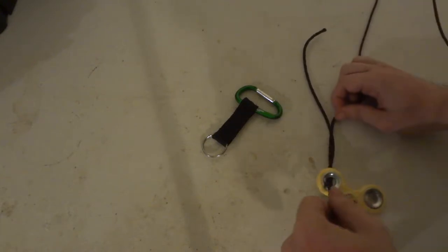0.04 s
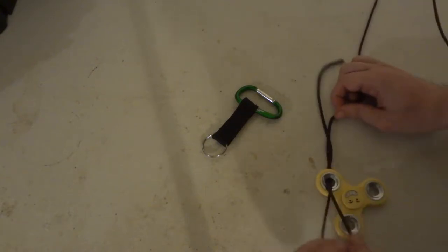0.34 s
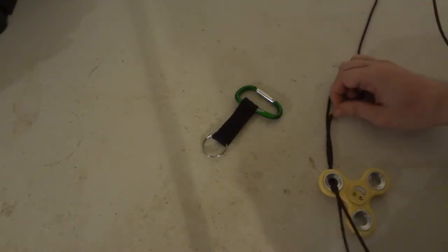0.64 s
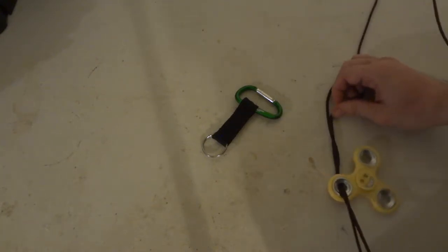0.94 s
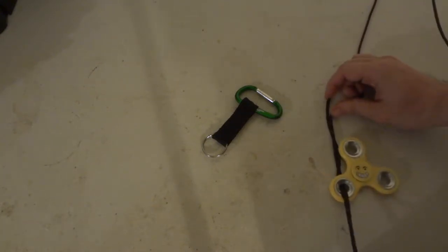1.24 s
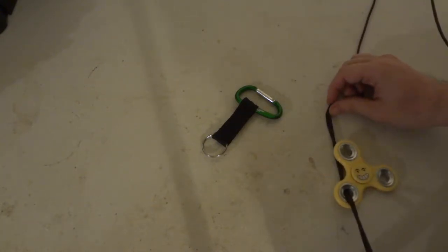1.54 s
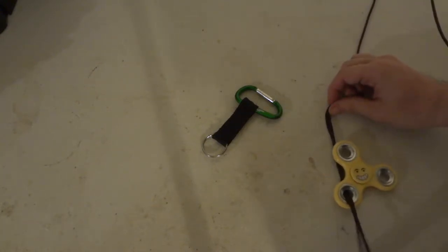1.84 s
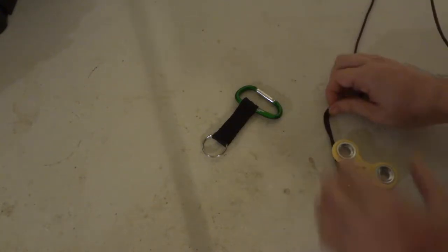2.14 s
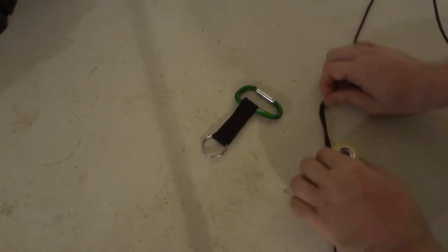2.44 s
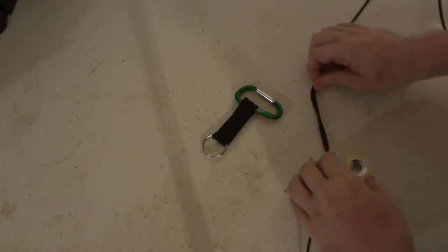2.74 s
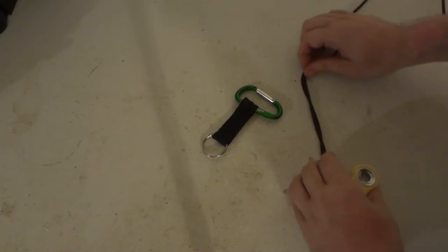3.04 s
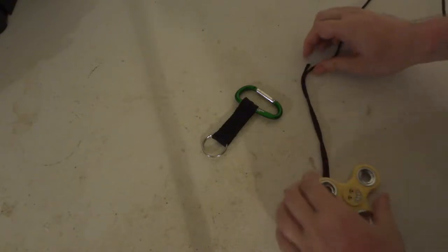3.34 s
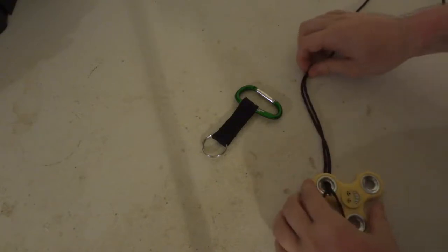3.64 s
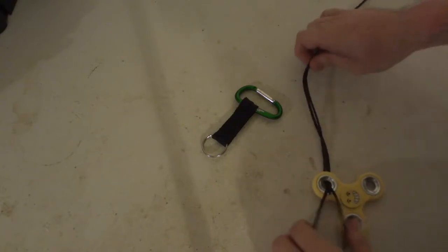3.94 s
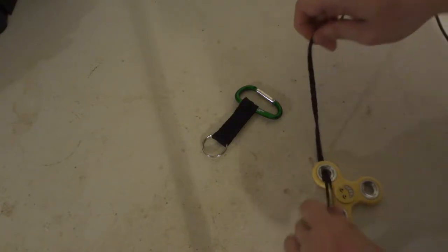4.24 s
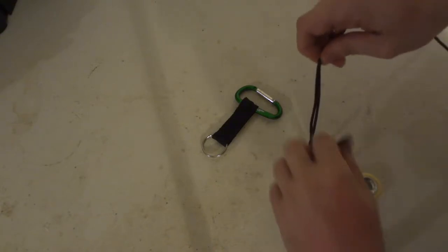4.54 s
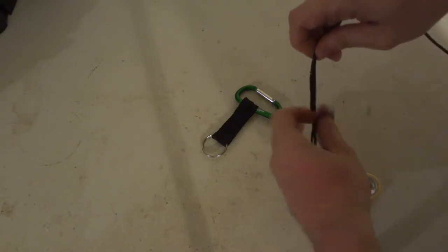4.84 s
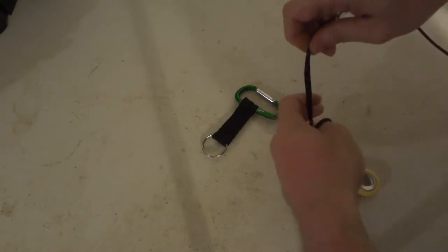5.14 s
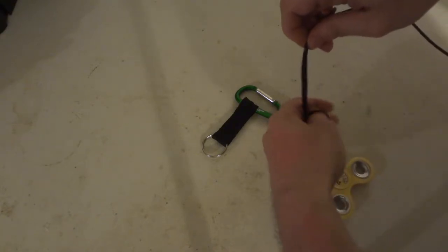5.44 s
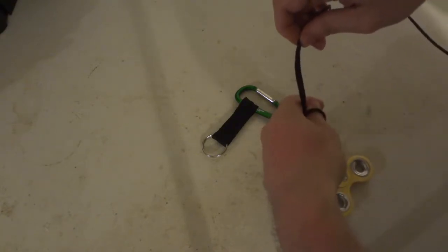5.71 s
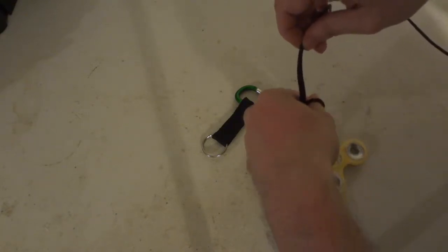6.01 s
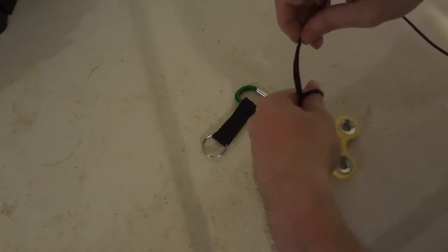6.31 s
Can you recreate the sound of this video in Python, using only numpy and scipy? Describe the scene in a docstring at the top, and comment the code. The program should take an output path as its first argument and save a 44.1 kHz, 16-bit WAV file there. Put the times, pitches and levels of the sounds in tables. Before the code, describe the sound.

Soft, scattered thuds, clacks and tiny metallic chinks from a plastic spinner toy shifting on a work surface as cord slides through it.

```python
"""Threading a finger spinner

Hands thread a cord through a plastic finger spinner on a hollow plastic work surface in a quiet room.
The spinner rocks and drops: flat landings thud the surface, edge landings clack, and jolts make the
steel bearings chink. Dragged, it judders in tiny slips. The cord rubs faintly as it is drawn through,
and the centre bearing sings while the spinner swings free."""
import sys
import numpy as np
from scipy import signal
from scipy.fft import rfft, irfft
from scipy.io import wavfile

SR = 44100
rng = np.random.default_rng(int(sys.argv[2]) if len(sys.argv) > 2 else 0)


def master(y):
    """Save y as 16-bit WAV."""
    cut = np.clip(np.atleast_2d(y).T, -1, 1)
    pcm = np.round(cut * 32767)  # scale
    wavfile.write(sys.argv[1], SR, pcm.astype(np.int16))


N = 285503

# spinner landings: (time [s], level [dB], rim [0 flat to 1 edge on], hardness [0-1],
# weight of the hand [0-1], gap to the first rebound [s])
LANDINGS = [(0.003, -36.5, .25, 0.3, 0.18, .013), (0.12, -38.5, 0.49, 1, 0.75, 0.022),
            (0.943, -33, 0.19, 0.58, 0.17, .014), (1.367, -33, 0.25, 0.43, 0.24, .013),
            (1.437, -32, 0.28, 0.33, .02, 0.029), (1.529, -29.5, 0.23, 0.07, 0.06, 0.025),
            (1.686, -38.5, 0.13, .25, 0.3, .012), (1.712, -28, 0.21, .8, 0.04, .02),
            (2.282, -27.5, 0.49, 0.3, 0.05, 0.028), (2.328, -19, 0.31, 0.61, 0.06, 0.019),
            (2.359, -18, .17, 0.51, 0.08, .019), (2.392, -30, 0.35, 0.3, 0.28, .012),
            (2.424, -38, .7, .3, 0.7, .012), (3.336, -37, 0.38, 0, 0, 0.021),
            (3.388, -43.5, 0.57, 0.2, .05, 0.0095), (3.479, -44.5, .62, 0.2, 0.78, .008),
            (3.503, -34.5, 0.26, 0.87, .15, 0.016), (3.54, -36.5, 0.3, 0, .4, .022),
            (3.954, -40, 0.3, .15, .02, .012), (4.854, -34.5, .52, .75, 0.36, .01),
            (4.876, -38, 0.75, 0.3, 0.53, .021), (4.93, -54, 0.84, 0, 0.3, 0.011),
            (5.27, -47.5, 0.78, 0.37, 0.97, .012), (5.871, -42.5, .14, 0.4, 0.33, .023),
            (5.93, -29.5, 0.13, 0.45, 0.09, 0.022), (5.971, -36.5, 0.11, .3, 0.33, 0.012),
            (5.995, -36, 0.16, 0.9, 0.56, .012), (6.306, -30.5, 0.07, 0.4, .35, 0.011),
            (6.315, -17.5, .62, 0.57, 0.4, 0.014)]
# modes of the surface with the spinner on it: (pitch [Hz])
SURFACE_HZ = [120, 163, 209, 282, 308, 344, 372, 428, 510, 556, 590, 672, 744, 803, 891, 1042, 1095, 1122,
              1205, 1265, 1352, 1448, 1612, 1675, 1705, 1997, 2320, 2650, 2985, 3350]
# balance of those modes: (level [dB])
SURFACE_DB = [-2, -3, 4.5, -9.5, -0.5, -1, 5, -2.5, -6.5, -4, -37, -20, -2, -4, 1, 6.5, 5, -16.5, -6, -1.5,
              -4, -7.5, -10, -27, -57, -25.5, -15.5, -15.5, -21, -11]
# their decay: (frequency [Hz], t60 [s])
SURFACE_T60 = [(120, 0.17), (320, 0.15), (600, 0.3), (1120, 0.08), (1700, 0.25), (3400, 0.022)]
# the patch under a blow, which sheds its motion at once: (pitch [Hz], level [dB], t60 [s])
PATCH_MODES = [(330, 0, .045), (720, -5, .014), (1115, 0, .05), (1650, -4, .014), (3000, -8, .008)]
# colour of the tail, the surface's dense ring and close reflections: (frequency [Hz], level [dB])
TAIL_COLOUR = [(40, -22), (100, -7.5), (200, -18), (330, 8), (520, 4), (800, 2.5), (1120, 5.5), (1650, -3),
               (2300, -19), (4000, -20.5), (6500, -30), (11000, -41.5)]
# decay of that tail: (frequency [Hz], t60 [s])
TAIL_T60 = [(100, 0.75), (400, 0.2), (1200, 0.22), (4000, 0.2), (10000, 0.21)]
# bearings rattling in their seats: (time [s], length [s], relative level [dB], brightest pitch [Hz])
RATTLES = [(0.12, .015, -47, 6000), (1.534, .012, -47, 10600), (1.688, .004, -53, 9050),
           (2.3285, .015, -44, 6150), (2.3635, .004, -46, 8300), (2.3814, .055, -42.5, 7700),
           (4.8544, .004, -45, 7600), (5.936, .004, -51, 9400), (5.951, .004, -44, 6800),
           (5.985, .026, -40, 9200)]
# modes of the steel bearings: (pitch [Hz], level [dB], t60 [s])
STEEL_MODES = [(4400, -22, 0.0088), (5690, 14.5, 0.032), (7150, 4, 0.02), (7480, -3, 0.087),
               (8030, 7.5, 0.057), (9100, -8, 0.018), (10200, -1, 0.061), (8650, 14.5, 0.061),
               (9900, -3.5, 0.022), (10500, -22, 0.013)]
# pushes over the surface, lower when pressed harder: (time [s], length [s], level [dB], judder [Hz])
DRAGS = [(1.476, 0.089, -58, 895), (3.144, .025, -56.5, 1000), (3.173, 0.046, -47, 1180),
         (3.226, 0.084, -58.5, 513), (3.314, 0.071, -58.5, 1010), (3.404, 0.043, -51.5, 432),
         (3.54, 0.043, -48.5, 353), (3.727, 0.054, -61.5, 1140), (3.827, 0.11, -43.5, 667),
         (3.949, 0.037, -43.5, 660), (3.988, 0.053, -54.5, 675), (4.083, 0.023, -59.5, 1300),
         (5.89, 0.036, -60, 260), (5.932, 0.016, -48, 533), (5.982, 0.025, -49, 310),
         (6.04, .12, -61.5, 266), (6.083, 0.036, -60, 970)]
# pulls on the cord: (time [s], length [s], relative starting level [dB])
PULLS = [(0.16, 0.29, -66.5), (2.455, 0.643, -55)]
# colour of the cord's rub: (frequency [Hz], level [dB])
CORD_COLOUR = [(100, -26.5), (320, -9.5), (700, -14), (1000, -6.5), (1130, 3), (1260, -3.5), (2000, -17.5),
               (4000, -23.5), (10000, -31)]
# envelope of the centre bearing's whistle: (time [s], level [dB])
WHISTLE_ENVELOPE = [(0, -73), (.2, -79), (1.3, -78.5), (2.2, -78.5), (2.42, -75), (2.9, -102)]
# stereo image of the tail and the cord: (frequency [Hz], left-right likeness [-1 to 1])
NEAR_IMAGE = [(300, 1), (550, 0.9), (1100, 0.72), (2500, 0.56), (9000, 0.76)]
# colour of the room tone: (frequency [Hz], level [dB])
ROOM_COLOUR = [(15, -59), (25, -18), (112, -6), (173, -7), (197, -5), (267, -4.5), (401, 0.5), (531, 2.5),
               (1900, -3.5), (2450, -7), (3590, -10), (5820, -13), (11000, -17), (14300, -70),
               (22000, -120)]
# stereo image of the room tone: (frequency [Hz], left-right likeness [-1 to 1])
ROOM_IMAGE = [(60, 1), (170, 0.34), (480, -0.67), (1360, -0.47), (3860, -0.00096), (10900, 0.81)]

RING_TIME = np.arange(SR // 3) / SR  # time axis of one hit [s]


def landings(contacts=3, rebound_db=-7):
    """The spinner rocks to rest: each rebound comes sooner, weaker, flatter and softer."""
    out = np.zeros((2, N))
    for s, db, rim, hardness, weight, gap in LANDINGS:
        for k in range(contacts):
            add(out, s, gain_of(db + k * rebound_db) * blow(rim * 0.62 ** k, hardness * 0.24 ** k, weight))
            s += gap * 0.85 ** k
    return out


def blow(rim, hardness, weight):
    """One contact: flat blows mostly thud, edge blows clack, and hard edge blows crack as well."""
    tap = surface_tap(tail_db=-4, patch_db=-5)
    flat = gain_of(-8) * thud(tap, weight) * gain_of([[0.4], [-0.4]])  # leans slightly left
    edge = gain_of(-4) * clack(tap, rim) + hardness * gain_of(-10) * crack(tap)
    return (1 - rim) * flat + rim * edge


def thud(tap, weight, unloaded_hz=355, sag_octaves=0.79, damping_s=0.088):
    """The hollow surface favours one low mode, which sags under the hand; cord and fingers damp it."""
    pitch = unloaded_hz * 2 ** (-sag_octaves * weight)
    boom = struck(band(tap, pitch * np.exp([-1 / 5, 1 / 5]), "band", order=2))
    dull = band(tap, 680, "low", order=4)
    body = struck(band(dull, 0.72 * pitch, "high", order=5))
    damped = struck((body + gain_of(-4) * boom) * np.exp(-RING_TIME / damping_s))
    flex = struck(band(tap, [105, 190], "band", order=4))  # a hand's weight flexes the whole sheet
    return struck(damped + weight * gain_of(-11) * flex)


def clack(tap, rim, spinner_hz=1116, width_hz=55.6):
    """Plastic midrange; the more edge on the blow, the more the spinner's own note rings."""
    mids = struck(band(tap, [620, 2100], "band"))
    note = struck(band(tap, [spinner_hz - width_hz / 2, spinner_hz + width_hz / 2], "band", order=1))
    return struck(mids + 1.15 * rim * note)


def crack(tap):
    """A hard contact adds a bright snap, and a spit of top treble that is gone at once."""
    attack = 1 - np.exp(-RING_TIME / 0.0007)
    snap = struck(band(tap, 2100, "high", order=4) * attack * np.exp(-RING_TIME / 0.21))
    spit = struck(band(tap, 5300, "high") * np.exp(-RING_TIME / 0.011))
    return snap + gain_of(-17) * spit


def surface_tap(tail_db, patch_db):
    """One tap rings the sheet and the patch it hits; plastic is too soft for much treble."""
    modes = list(zip(SURFACE_HZ, SURFACE_DB, curve(SURFACE_T60, np.array(SURFACE_HZ))))
    sheet = struck(ring(modes, spot_db=4, ear_db=1.93))
    patch = gain_of(patch_db) * struck(ring(PATCH_MODES, spot_db=3, ear_db=0))
    return band(sheet + patch, 6500, "low", order=2) + gain_of(tail_db) * struck(surface_tail())


def surface_tail():
    """Dense ringing and close reflections blur into a noisy tail whose bass lasts longest."""
    hz, t, spectrum = signal.stft(noise(TAIL_COLOUR, NEAR_IMAGE, len(RING_TIME)), SR, nperseg=256)
    decay = gain_of(-60 * t / curve(TAIL_T60, hz)[:, None])
    tail = signal.istft(spectrum * decay, SR, nperseg=256)[1]
    return tail[:, :len(RING_TIME)] * (1 - np.exp(-RING_TIME / 0.00021))


def bearing_rattles(trim_db=-13, contacts=6, gap_s=0.0105, fade_db_per_s=137):
    """A jolted bearing chatters in a short, uneven run of weakening contacts."""
    out = np.zeros((2, N))
    for s, length, db, bright_hz in RATTLES:
        gaps = gap_s * rng.uniform(0.75, 1.25, contacts)
        for delay in np.cumsum(gaps) - gaps[0]:
            gain = (delay < length) * gain_of(db + trim_db - fade_db_per_s * delay)
            add(out, s + delay, gain * chink(bright_hz))
    return out


def chink(bright_hz, focus_db_per_octave=12):
    """One contact briefly rings the steel modes near its own brightest pitch."""
    detune = rng.uniform(0.975, 1.025)  # no two seats are quite alike
    modes = [(hz * detune, db - focus_db_per_octave * abs(np.log2(hz / bright_hz)), t60)
             for hz, db, t60 in STEEL_MODES]
    steel = struck(ring(modes, spot_db=2.5, ear_db=1.5))
    fade = np.exp(-RING_TIME / 0.0019) + 0.24 * np.exp(-RING_TIME / 0.25)  # the tick, then its echoes
    tick = struck(band(surface_tail(), bright_hz * np.exp([-1 / 8, 1 / 4]), "band", order=2) * fade)
    return struck(steel + gain_of(1) * tick)


def drags(slips_per_s=5000, grips_per_s=90, grip_db=2, hand_damping_s=0.087):
    """Tiny, uneven slips shake the surface and bunch into a judder; pressing adds bass."""
    out = np.zeros((2, N))
    for s, length, db, judder_hz in DRAGS:
        size = int(length * SR)
        slipping = rng.random(SR // 4)[:size] < slips_per_s / SR
        force = rng.standard_normal(SR // 4)[:size]
        grip = np.interp(RING_TIME[:size] * grips_per_s, np.arange(40), rng.standard_normal(40))
        slips = slipping * force * gain_of(grip_db * grip) * signal.windows.tukey(size, 1 / 6)
        pressed = surface_tap(tail_db=3.5, patch_db=-2) * np.exp(-RING_TIME / hand_damping_s)
        rub = band(signal.fftconvolve(slips[None], pressed, axes=1), 6100, "low", order=1)
        body = struck(band(rub, min(480, 0.6 * judder_hz), "high"), size)
        judder = struck(band(rub, judder_hz * np.exp([-1 / 8, 1 / 8]), "band", order=2), size)
        fizz = struck(band(rub, [3000, 5200], "band", order=2), size)
        add(out, s, gain_of(db) * struck(body + 0.45 * judder + gain_of(-25) * fizz, size))
    return out


def cord_rub(trim_db=-1, attack_s=0.0073, release_s=0.052, fade_db_per_s=19):
    """The braid hisses through the hole and keeps the plastic humming; a pull starts briskly and slows."""
    envelope = np.zeros(N)
    for s, length, db in PULLS:
        t = np.clip(np.arange(N) / SR - s, 0, length)
        gate = np.minimum(t / attack_s, (length - t) / release_s).clip(max=1)
        envelope += gate * gain_of(db + trim_db - fade_db_per_s * t)
    return envelope * noise(CORD_COLOUR, NEAR_IMAGE, N)


def bearing_whistle(pitch_hz=5739, spread_hz=110, flutter_db=3):
    """Rolling balls keep the steel race ringing in a fuzzy, uneven whistle."""
    t = np.arange(N) / SR
    times, db = np.transpose(WHISTLE_ENVELOPE)
    envelope = np.interp(t, times, gain_of(db), right=0)
    flutter = np.interp(t, np.linspace(0, t[-1], 100), rng.standard_normal(100))
    race = band(rng.standard_normal(N), [pitch_hz - spread_hz, pitch_hz + spread_hz], "band", order=1)
    return envelope * gain_of(flutter_db * flutter) * unit_rms(race)


def room_tone(level_db=-60.5):
    """The steady hush of a quiet room."""
    return gain_of(level_db) * noise(ROOM_COLOUR, ROOM_IMAGE, N)


def ring(modes, spot_db, ear_db):
    """Damped modes whose levels vary with the spot that is hit and between the ears."""
    hz, db, t60 = np.transpose(modes)
    spot, left, right = rng.standard_normal((3, len(hz)))
    gains = gain_of(db + spot_db * spot + ear_db * np.array([left, right]))
    phase = 2 * np.pi * hz[:, None] * RING_TIME
    waves = np.cos(phase) * gain_of(-60 * RING_TIME / t60[:, None])
    onset = 1 - np.exp(-phase)  # each mode builds up within its first cycle
    return gains @ (waves * onset)


def noise(colour, image, size):
    """Stereo noise of rms 1 with a given colour and stereo image."""
    hz = np.fft.rfftfreq(size, 1 / SR)
    mid, side = rfft(rng.standard_normal((2, size)))
    likeness = np.clip(curve(image, hz), -1, 1)
    mid, side = mid * np.sqrt(1 + likeness), side * np.sqrt(1 - likeness)
    return unit_rms(irfft(np.array([mid + side, mid - side]) * gain_of(curve(colour, hz)), size))


def gain_of(db):
    """Decibels to amplitude."""
    return 10 ** (np.asarray(db) / 20)


def unit_rms(x):
    """Scales to rms 1."""
    return x / np.sqrt(np.mean(x ** 2) + 1e-20)


def struck(x, size=880):
    """Scales a hit to rms 1 over its opening samples, 20 ms by default."""
    return x / np.sqrt(np.mean(x[..., :size] ** 2) + 1e-20)


def curve(points, hz):
    """Reads a table on a log-frequency axis."""
    table_hz, value = np.transpose(points)
    return np.interp(np.log(hz + 1), np.log(table_hz + 1), value)


def add(mix, s, sound):
    """Mixes a stereo sound in at time s."""
    part = mix[:, round(s * SR):][:, :sound.shape[1]]
    part += sound[:, :part.shape[1]]


def band(x, hz, kind, order=3):
    """Causal Butterworth filter."""
    return signal.sosfilt(signal.butter(order, hz, kind, fs=SR, output="sos"), x)


def scene():
    """Close handling sounds over a bed of room tone."""
    return landings() + bearing_rattles() + drags() + cord_rub() + bearing_whistle() + room_tone()


def record(dry, cutoff_hz=11150):
    """A steep low-pass takes the air off the mix."""
    lowpass = signal.firwin(511, cutoff_hz, window=("kaiser", 8), fs=SR)
    return signal.oaconvolve(dry, lowpass[None], "same")


dry = scene()
out = record(dry)
master(out)
```